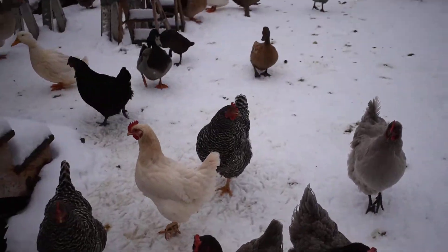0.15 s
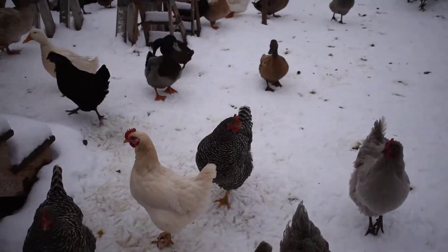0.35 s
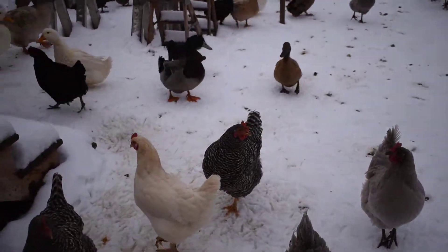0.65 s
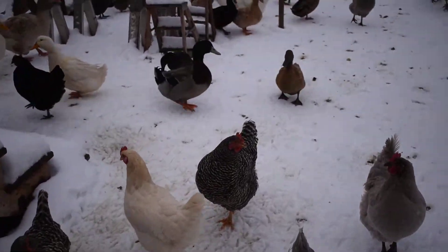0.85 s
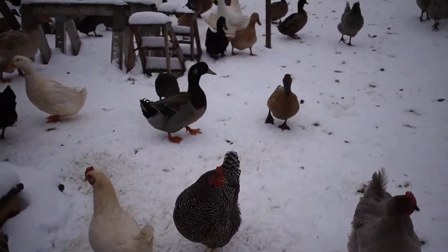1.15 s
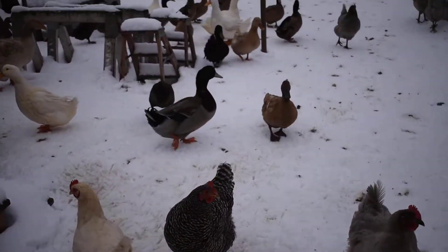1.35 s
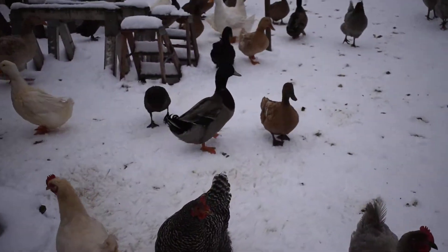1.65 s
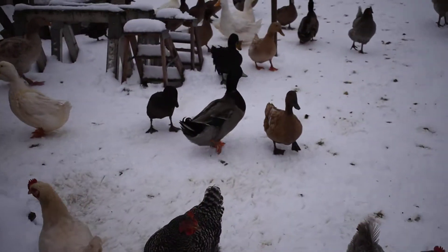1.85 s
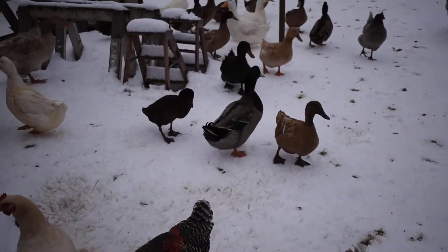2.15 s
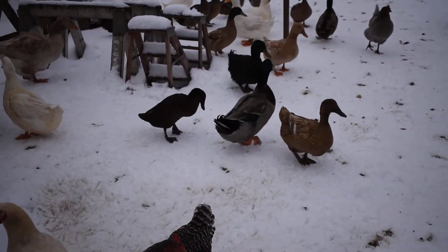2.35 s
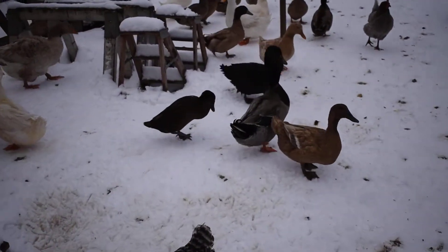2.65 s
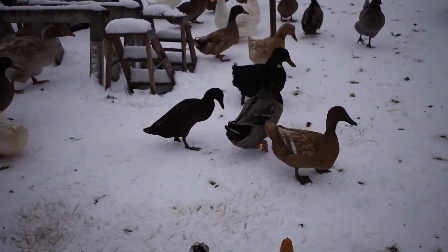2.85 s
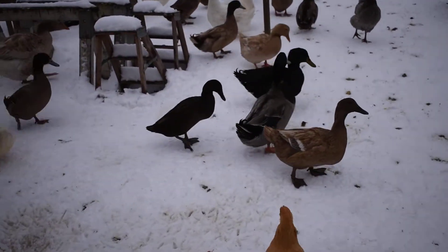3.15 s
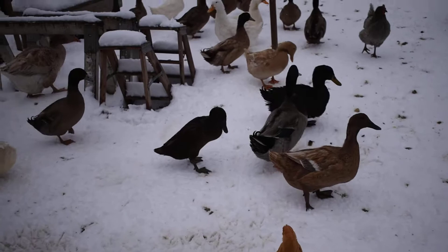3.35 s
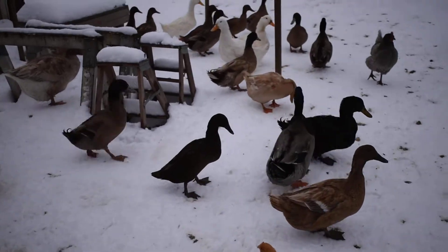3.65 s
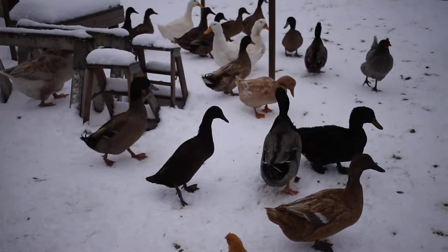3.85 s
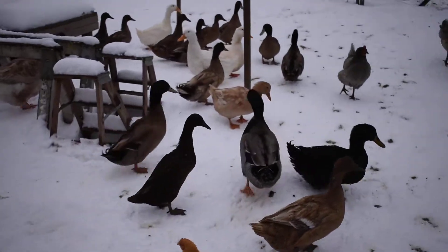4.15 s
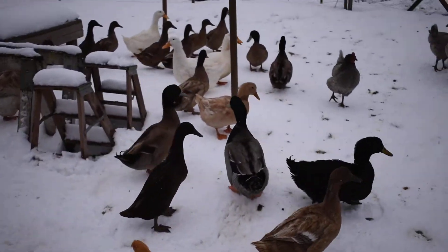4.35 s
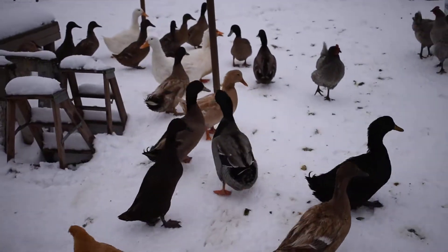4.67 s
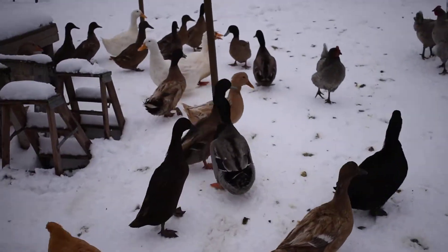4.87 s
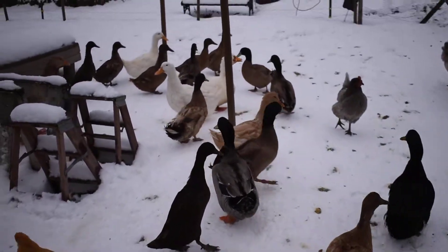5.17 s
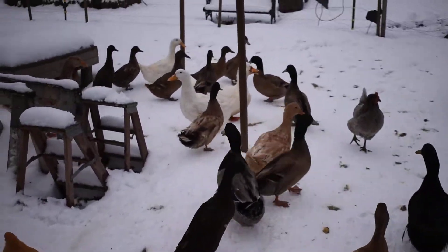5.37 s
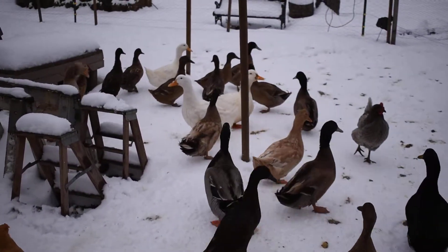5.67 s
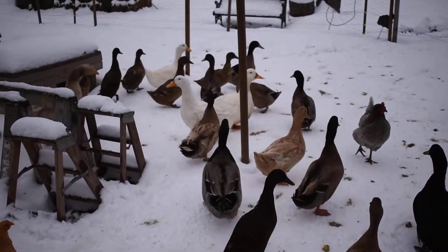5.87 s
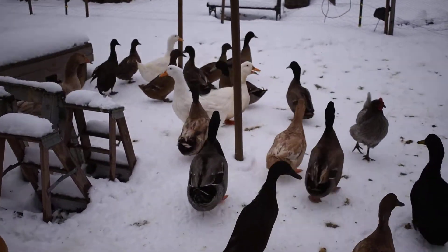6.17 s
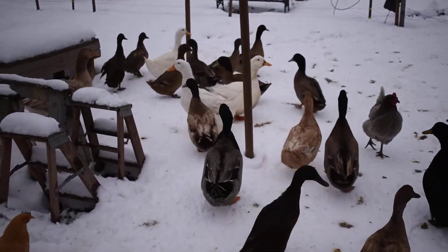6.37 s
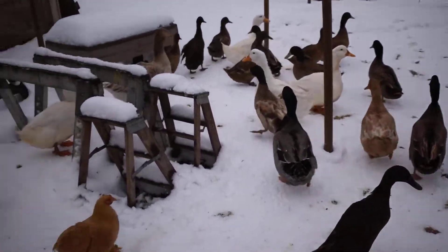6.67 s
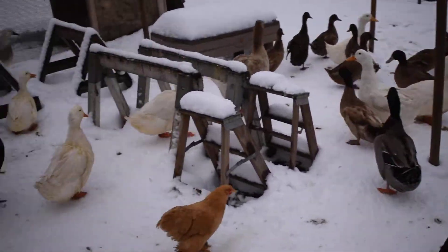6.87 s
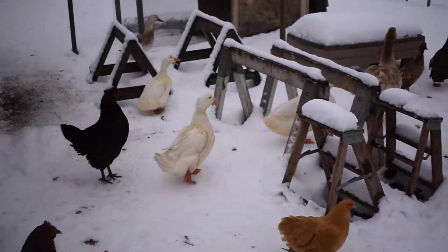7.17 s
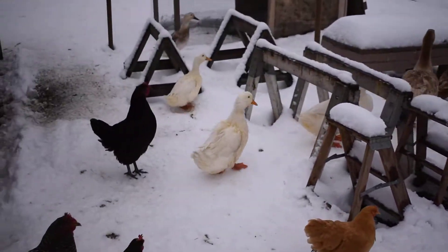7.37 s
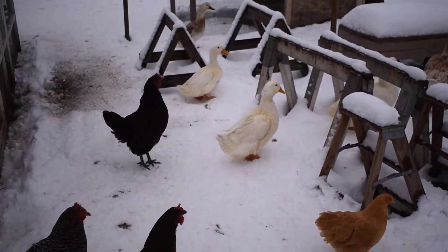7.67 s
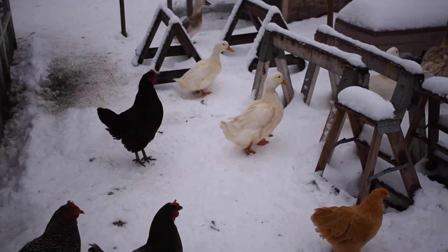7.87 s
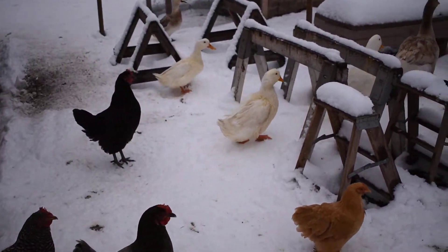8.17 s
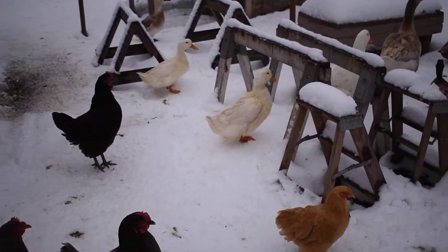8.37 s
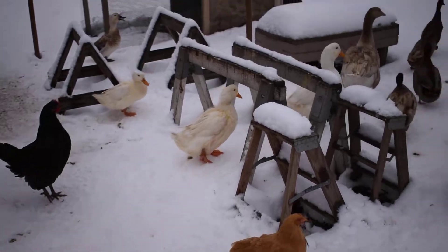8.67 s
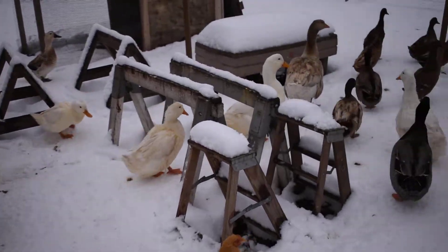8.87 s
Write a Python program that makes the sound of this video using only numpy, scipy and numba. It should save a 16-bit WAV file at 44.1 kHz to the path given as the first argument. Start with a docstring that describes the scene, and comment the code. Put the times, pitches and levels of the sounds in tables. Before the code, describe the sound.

Ducks chatter in rapid short quacks, then louder overlapping drawn-out quacks, over a muttering outdoor flock, with soft close knocks and late goose honks.

```python
"""A snowy yard in outdoor air: a far flock mutters throughout and a hen croons in the first second.
Near ducks chatter in short quacks, a drake mutters and dull knocks sound close to the microphone; a cluck
and a thin peep follow. From about four seconds long arched quacks take over, and late on a goose honks.
Pulses and breath ring the ducks' bills and throats; hen, goose, cluck and peep are sums of partials.
Knocks are damped swings with noise, the air is banded noise, and the snow leaves little echo."""
import sys
import numpy as np
from scipy import signal
from scipy.io import wavfile
from scipy.ndimage import uniform_filter1d
from numba import njit

SR = 44100
rng = np.random.default_rng(int(sys.argv[2]) if len(sys.argv) > 2 else 0)


def persist_wave(psi):
    """Save psi, clipped to +-1, as 16-bit WAV."""
    counts = np.round(np.clip(psi, -1, 1) * 32767).astype(np.int16)
    wavfile.write(sys.argv[1], SR, np.atleast_2d(counts).T)


N = 397782  # length in samples


def undb(db):
    """Turns dB into an amplitude factor."""
    return 10 ** (np.asarray(db) / 20)


def unit(x):
    """Scales a signal to an rms of 1."""
    return x / np.sqrt(np.mean(x ** 2) + 1e-18)


@njit
def svf(x, hz, width):
    """State-variable band-pass with a moving centre, gain 1 at the centre."""
    y, band, low, g, k, last_hz = np.empty(len(x)), 0., 0., 0., 0., 0.
    for i in range(len(x)):
        if hz[i] != last_hz:
            g, k, last_hz = np.tan(np.pi * hz[i] / SR), width / hz[i], hz[i]
        v = (band + g * (x[i] - low)) / (1 + g * (g + k))
        band = 2 * v - band
        low += 2 * g * v
        y[i] = k * v
    return y


def ring(x, hz, *widths_hz):
    """Rings a resonance: one band-pass at the same centre for each width."""
    for width in widths_hz:
        x = svf(x, hz + np.zeros(len(x)), 1. * width)
    return x


def walk(count, rate):
    """Random levels held 1 / rate s and slewed; spread near 1."""
    hold = int(SR / rate)
    steps = np.repeat(rng.standard_normal(count // hold + 1), hold)
    return 1.2 * uniform_filter1d(steps, hold)[:count]


def arch(start, length, turn, start_hz, turn_hz, end_hz, flat=2):
    """Times, progress 0-1 and a pitch that bends along two curves meeting flat at the turn."""
    u, turn = np.linspace(0, 1, num=41), np.clip(turn, .02, .98)
    away = np.where(u < turn, 1 - u / turn, (u - turn) / (1 - turn)) ** flat
    hz = turn_hz + (np.where(u < turn, start_hz, end_hz) - turn_hz) * away
    return start + length * u, u, hz


def swell(s, attack_s, release_s, ends_db):
    """Attack, hold and release in dB."""
    edge = np.maximum(1 - (s - s[0]) / attack_s, 1 - (s[-1] - s) / release_s)
    return ends_db * np.clip(edge, 0, 1)


def add(out, rows, voice, onset=.005, **settings):
    """Plays one call from its control rows (time first), with soft ends; onset in s."""
    s, *columns = np.transpose(rows)
    i, j = max(int(s[0] * SR), 0), min(int(s[-1] * SR), N)
    t = np.arange(i, j) / SR
    ends = np.clip(np.minimum((t - s[0]) / onset, (s[-1] - t) / 0.0015), 0, 1)
    controls = [np.interp(t, s, column) for column in columns]
    out[i:j] += ends * voice(*controls, **settings)


# outdoor noise colour: freq_hz, level_db (per Hz, relative)
AIR_COLOUR = [(25, -27), (60, -18), (125, -11), (220, -3), (400, -8), (1000, -6), (1800, -8), (3000, -14),
              (6300, -15), (8500, -21), (12500, -25), (16000, -29)]
# lift of the air bands under 200 Hz, before the overall level is set: time_s, lift_db
BASS_LIFT = [(0, 12.5), (1.998, 7), (3.3, 6.5), (3.7, 11), (4.1, 14), (4.3, 9), (4.6, -4), (6, 0.5),
             (7.1, 11), (7.7, 2), (8.5, 4), (8.7, 15), (9.02, 2)]


def air():
    """Half-octave bands of outdoor noise that swell together and flicker alone; the bass comes and goes."""
    out, common, gust = 0, walk(N, 4.51), walk(N, 7)
    rumble_db = np.interp(np.arange(N) / SR, *np.transpose(BASS_LIFT))
    colour_hz, colour_db = np.transpose(AIR_COLOUR)
    for hz in 30 * 2 ** np.arange(0, 9.1, .5):
        db = np.interp(np.log(hz), np.log(colour_hz), colour_db)
        db = db + 2 * common + 3 * walk(N, 9) + (rumble_db + 3.5 * gust) * (hz < 200)
        out = out + undb(db) * ring(rng.standard_normal(N), hz, hz, hz)
    return unit(out) * undb(-44.5)


@njit
def fire(hz, stretch, size):
    """A pulse at each wrap of the phase, shared between two samples; every cycle has its own length."""
    pulses, phase, p, k = np.zeros(len(hz) + 1), np.empty(len(hz)), .9, 0
    for i in range(len(hz)):
        step = hz[i] * stretch[k] / SR
        p += step
        if p >= 1:
            p, k = p - 1, k + 1
            pulses[i] += size[k] * p / step
            pulses[i + 1] += size[k] * (1 - p / step)
        phase[i] = p
    return pulses[:-1], phase


# fixed lower duck resonances: freq_hz, width_hz (each of two passes), level_db (before each call's trim)
LOWER_THROAT = [(760, 300, -15), (1020, 300, -9)]
# upper duck resonances, before each call's scaling: freq_hz, width_hz (each of two passes), level_db
UPPER_THROAT = [(3210, 530, 2), (4090, 500, -2.5), (4976, 580, 0), (5937, 440, -2.5), (7020, 580, -2.5),
                (8080, 1900, -15.5), (10530, 1500, -25.5), (13300, 1600, -32)]
PATCHY_DB = 3.2  # each upper throat resonance swells and fades on its own


def quack(hz, db, bill_hz, chest_db, treble_db, scale, rough, half, second_db, second,
          lowest_db=0, blunt=1, puff=0, throat_db=0, breath_db=-9):
    """Syrinx pulses and pulse-gated breath ring the bill and throat; the chest adds a clean low tone."""
    turn = np.cumsum(hz) / SR
    # the membranes are slack, so rougher, while the pitch is still below its top
    rough = np.clip(rough + 1.1 * (1 - hz / hz.max()) ** 1.5, 0, .6)
    cycle = np.arange(len(hz) // 40 + 4)
    chance = np.clip(rng.standard_normal((2, len(cycle))), -2, 2) * np.interp(cycle, turn, rough)
    size = undb(9 * chance[1]) * (1 - half * (cycle % 2))  # every second pulse is weaker by half
    pulses, phase = fire(hz, 1 + .11 * chance[0], size)
    breath = unit(np.exp(-phase / .3) * rng.standard_normal(len(hz)))
    drive = unit(pulses) + (1.3 * rough + puff) * breath
    low = ring(drive, bill_hz, 460, 536)
    # a second resonance moves with the bill
    low = low + undb(second_db) * ring(drive, second * bill_hz, 160, 630)
    for f, width, level_db in LOWER_THROAT:
        low = low + undb(level_db + throat_db) * ring(drive, f, width, width)
    airy = drive + (undb(breath_db) + 1.5 * rough) * breath
    high = 0
    for k, (f, width, level_db) in enumerate(UPPER_THROAT):
        gain = undb(level_db + lowest_db * (k == 0) + PATCHY_DB * walk(len(hz), 9))
        # neighbouring resonances have opposite signs
        high = high + (-1) ** k * gain * ring(airy, f * scale, width * blunt, width * blunt)
    chest = np.sqrt(2) * (np.sin(2 * np.pi * turn) + 0.14 * np.sin(4 * np.pi * turn))
    return -undb(db) * (unit(low) + undb(treble_db) * unit(high)) + undb(chest_db) * chest


# level of the whole far flock: time_s, level_db
FLOCK_LEVEL = [(0, -38), (.2, -47), (.35, -36), (.46, -46), (.95, -41.5), (1.28, -37.5), (1.4, -41),
               (1.5, -38.5), (1.65, -39.5), (2.1, -41), (2.25, -42), (2.6, -36), (2.76, -49), (2.95, -33.5),
               (3.15, -32), (3.4, -40), (3.52, -35), (3.64, -46), (3.9, -25), (4.17, -48.5), (4.3, -27.5),
               (4.721, -38), (6.05, -30.5), (6.449, -36), (6.92, -38), (7.3, -36), (7.38, -29.5),
               (7.47, -34.5), (7.8, -31.5), (8.36, -30), (8.52, -31), (9.02, -33)]


def far_flock():
    """Three far birds mutter hoarsely, each swelling and fading on its own, under one shared level."""
    birds, one = 0, np.ones(N)
    # mean pulse rate Hz, bill resonance Hz, chest tone dB
    for hz, bill_hz, chest_db in ((134.8, 1796, -44.0), (200, 920, -19), (250, 1295, -18.0)):
        wandering_hz, level_db = hz * undb(walk(N, 5)), 3.5 * walk(N, 11)
        moving_bill_hz = bill_hz * undb(1.23 * walk(N, 5.4))
        birds = birds + quack(wandering_hz, level_db, moving_bill_hz, chest_db * one, -19 * one, one,
                              rough=.35, half=0, second_db=-14, second=1.396,
                              lowest_db=-13, blunt=0.72, puff=1.0)
    return unit(birds) * undb(np.interp(np.arange(N) / SR, *np.transpose(FLOCK_LEVEL)))


def tone(hz, first_db, second_db, rasp_db, partials, throat):
    """A reedy voice roughened by noise; with a throat, rasp turns high partials into windpipe hiss."""
    turn = 2 * np.pi * np.cumsum(hz * (1 + .004 * walk(len(hz), 60))) / SR
    depth = np.clip(undb(rasp_db), 0, .4)
    rasp, mean_db = depth * walk(len(hz), 450), (first_db + second_db) / 2
    out = (1 + rasp) * (undb(first_db) * np.sin(turn) + undb(second_db) * np.sin(2 * turn))
    for multiple, db in partials:
        whole = np.clip(1 - depth * multiple * .18, 0, 1) if len(throat) else 1
        out = out + whole * (1 + 2 * rasp) * undb(mean_db + db) * np.sin(multiple * turn)
    puffs = (1 + np.sin(turn)) * rng.standard_normal(len(hz))
    for f, width, db in throat:
        out = out + depth * undb(mean_db + db) * unit(ring(puffs, f, width, width))
    return np.sqrt(2) * out


def sing(notes, partials=(), throat=()):
    """Plays tonal notes: the pitch bends through a turn while level and second partial glide."""
    out = np.zeros(N)
    for row in notes:
        s, u, hz = arch(*row[:6])
        db, change_db, second_db, end_second_db, rasp_db = row[6:]
        first_db = db + change_db * u + swell(s, attack_s=0.0023, release_s=0.0025, ends_db=-5)
        second = first_db + second_db + (end_second_db - second_db) * u
        rows = np.transpose([s, hz, first_db, second, rasp_db + 0 * u])
        add(out, rows, tone, partials=partials, throat=throat)
    return out


# hen notes: start_s, length_s, turn_share (of the length), start_pitch_hz, turn_pitch_hz, end_pitch_hz,
# level_db (first partial), end_change_db, second_start_db, second_end_db (both over the first), rasp_db
HEN_NOTES = [(-.01, 0.12, 0.49, 874, 939, 816, -30.5, -3, -16, -11, -7),
             (.135, 0.3, 0.4, 828, 781, 817, -34, -12, -26, -9, -5),
             (.455, 0.098, .45, 773, 827, 800, -35.5, 1.5, -38, -45, -22),
             (.546, 0.12, .4, 810, 825, 755, -32, -2.5, -41, -35, -27),
             (.675, 0.082, .1, 760, 748, 814, -39, 8.5, -27, -18, -13),
             (.762, 0.026, .5, 800, 807, 800, -29.5, -4, -30, -27, -5),
             (.786, 0.073, .6, 840, 872, 890, -25.5, -4, -42, -24, -14),
             (1.002, .046, .5, 824, 860, 845, -31.5, 2, -17, -7, -13)]
# multiple (of the pitch), level_db (over the mean dB of the first two partials)
HEN_OVERTONES = [(.5, -5), (3, -28)]


def hen():
    """An early croon: soft bending tones with a partial an octave below."""
    return sing(HEN_NOTES, HEN_OVERTONES)


# short quacks: start_s, level_db (before the shape), pulse_rate_hz and bill_hz (before the sag),
# chest_db (over level, before an 8.5 dB lift), treble_db (over the bill and lower throat), length_s (of the hold)
SHORT_QUACKS = [(0.102, -12.5, 223.6, 1300, -22.5, -12.5, 0.018), (0.228, -15, 216, 1700, -15, -7, 0.012),
                (0.362, -34, 210, 1600, -6, -26, 0.041), (0.594, -18, 263, 1650, -18, -12, 0.0066),
                (0.732, -8, 260.6, 1650, -21, -6.5, 0.011), (1.047, -11.5, 263.3, 1730, -20, -11, 0.0056),
                (1.114, -19.5, 235.5, 1040, -15, -30, 0.017), (1.19, -9, 250, 1790, -18.5, -5, 0.023),
                (1.315, -9.5, 236, 1700, -16.5, -4, 0.019), (1.597, -8.5, 218, 1700, -19.5, -9, 0.0083),
                (1.749, -8, 243.4, 1770, -23, -12, 0.03), (1.877, -8, 255.5, 1700, -22.5, -12.5, 0.026),
                (1.99, -9, 232.8, 1640, -20.5, -14, 0.021), (2.297, -26, 222.5, 1090, -7.5, -6, 0.012),
                (2.398, -13.5, 194.7, 1650, -21, -13.5, 0.01), (2.509, -11, 238, 1600, -19.5, -5.5, 0.019),
                (2.689, -9, 219, 1090, -26.5, -15.5, 0.018), (2.789, -16.5, 266.6, 1610, -12, -9.5, 0.0075),
                (2.832, -33, 217, 930, -21, -3, 0.068), (2.898, -8, 232.5, 1650, -21, -6.5, 0.025),
                (3.033, -11.5, 216, 1590, -18, -8.5, 0.0097), (3.112, -16, 215.7, 1600, -20, -9.5, 0.01),
                (3.236, -9.5, 216.6, 1810, -20.5, -13, 0.01), (3.264, -11.5, 248.4, 1270, -20, -14, 0.013),
                (3.456, -11.5, 202.2, 1830, -20, -15, 0.012), (3.496, -25.5, 191.5, 1350, -25, -21, 0.033),
                (3.57, -4, 238, 1780, -29.5, -19, 0.009), (3.699, -8.5, 197, 1700, -27, -18, 0.02),
                (4.198, -27, 220.6, 1010, -32, -17, 0.019), (6.492, -23, 209, 860, -14, -19, 0.034),
                (6.978, -24, 210, 875, -20, -30, 0.032)]


def chatter():
    """Short duck quacks that start hard and sag in pitch and bill resonance."""
    out = np.zeros(N)
    for start, db, hz, bill_hz, chest_db, treble_db, length in SHORT_QUACKS:
        # time s, level change dB, pitch factor
        shape = [(-.009, -24, 1), (.004, -10, 1), (length * 0.93, -9, .97),
                 (length + 0.0048, -18, .92), (length + 0.023, -36, .9)]
        rows = [(start + t, hz * sag, db + g, bill_hz * sag, db + chest_db + g + 8.5, treble_db, 1.08)
                for t, g, sag in shape]
        add(out, rows, quack, onset=0.0052, rough=.17, half=0, second_db=-12, second=1.39,
            lowest_db=3, blunt=1.54, puff=.25, breath_db=-3)
    return out


# knocks near the microphone: start_s, level_db (before an 11.5 dB lift and the damping),
# pitch_hz, crack_db (gain of the crack noise over the swing)
CLOSE_KNOCKS = [(0.187, -22.5, 324, -21), (0.699, -32.5, 199, -36), (0.954, -30, 385, -34),
                (1.05, -21, 443, -38), (1.097, -23.5, 480, -40), (1.115, -26, 363, -40),
                (1.149, -26, 286, -40), (1.683, -24.5, 285, -37), (1.817, -33.5, 338, -34),
                (1.843, -36, 240, -32), (1.957, -32, 190, -29), (2.583, -23, 355, -40),
                (2.595, -31, 250, -35), (2.636, -24.5, 404, -13), (2.648, -31.5, 298, -30),
                (2.73, -32.5, 284, -39), (2.746, -32, 270, -39), (2.779, -32, 250, -39),
                (3.402, -38, 119, -14), (3.417, -35, 150, -18), (3.495, -22, 352, -40),
                (3.974, -23, 480, -35), (3.99, -33, 131, -35), (4.208, -35.5, 217, -9),
                (4.287, -25, 410, -31), (4.369, -24.5, 272, -29), (5.349, -26, 343, -20),
                (5.377, -30.5, 242, -12), (6.908, -41, 288, -8), (7.037, -25, 397, -28),
                (7.15, -36, 288, -21), (8.682, -31, 450, -18), (8.73, -28, 400, -23)]


def knocks():
    """Each knock is a heavily damped low swing, a short dull crack and a crunchy low tail."""
    out, t = np.zeros(N + SR), np.arange(SR // 10) / SR
    for start, db, hz, crack_db in CLOSE_KNOCKS:
        noise = rng.standard_normal(len(t))
        swing = np.sin(2 * np.pi * hz * t) * np.exp(-t * hz / 1.2) * np.clip(t / 0.0012, 0, 1) ** 2
        crack = undb(crack_db) * ring(noise, 3000, 8100) * np.exp(-t / 0.0043)
        crunch = undb(-16.0) * unit(ring(noise, 0.63 * hz, hz))
        crunch = crunch * np.exp(-t / 0.022) * np.clip(t / 0.0015, 0, 1)
        i = int(start * SR)
        out[i:i + len(t)] += undb(db + 11.5) * (swing + crack + crunch)
    return signal.sosfilt(signal.butter(2, 60, "high", fs=SR, output="sos"), out[:N])


RISING_DB_PER_OCTAVE, FALLING_DB_PER_OCTAVE = 22.5, 10  # treble lost per octave of pitch under the top
THROAT_PER_OCTAVE = 0.27  # the upper throat resonances sink with the pitch
WAVER, WAVER_DB = .03, 1.8  # unsteady pitch share per unit of roughness, and unsteady level
# long quacks: start_s, length_s, top_share (of the length), start_rate_hz, top_rate_hz, end_rate_hz (pulses),
# level_db, end_change_db, start_bill_hz, top_bill_hz, end_bill_hz, second_bill_db, chest_db,
# treble_db (over the bill and lower throat, at the top pitch), throat_scale (at the top pitch)
LONG_QUACKS = [(0.249, 0.178, 0.45, 240.9, 311.3, 224, -23.5, -2, 940, 1140, 1050, -32, -44, -18, 0.94),
               (.855, 0.065, 0.75, 212, 211.5, 200, -18.5, -5, 1100, 1080, 1050, -1, -38, -12.5, 0.91),
               (3.129, 0.066, 0.29, 250, 265, 240, -26, -1, 1400, 1400, 1500, -13, -34.5, -5.5, 0.77),
               (3.787, 0.082, 0.74, 196.8, 265.4, 270, -18.5, -7.5, 950, 1080, 1080, -24, -34, -13, 0.81),
               (3.895, 0.072, 0.106, 256, 269.2, 197, -23, 5.5, 1080, 1050, 1190, -27, -41, -17.5, 1),
               (4.245, 0.059, 1, 210, 228.7, 224, -28.5, 2.5, 1850, 1500, 1200, 1, -51, -12, 0.99),
               (4.335, 0.32, 0.71, 200, 348, 241.7, -14.5, -3, 1040, 1500, 1450, -7.5, -48.5, -1.5, 0.9),
               (4.8, 0.08, 1, 237, 240, 247, -22.5, -4, 1170, 1240, 1260, -8, -32.5, -12.5, 1),
               (4.862, 0.24, 0.59, 224.3, 329.5, 278.5, -13, -4, 1130, 1430, 1310, -8.5, -44, -4.5, 0.9),
               (5.09, .31, 0.5, 308, 287.5, 266, -27, 9, 1450, 1360, 1300, -3.5, -45.5, -4.5, 0.95),
               (5.371, 0.065, 0.62, 238.2, 243.5, 260, -17.5, -1.5, 1220, 1170, 1200, -4, -37, -5, 1),
               (5.415, 0.2, 0.75, 250, 301.7, 272, -17.5, -1, 1500, 1630, 1700, -7, -40.5, -3.5, 0.93),
               (5.61, 0.37, 0.43, 259.1, 337, 252.7, -18.5, -9.5, 1320, 1830, 1500, -18, -39, -1, 0.97),
               (5.635, 0.26, 0.52, 222.8, 284, 268, -23, 6, 1640, 1730, 1860, -15, -48, -8, 0.74),
               (5.846, 0.19, 0.51, 230.5, 238.7, 189, -24.5, 0, 1770, 1260, 1190, -19, -45, -15, 0.94),
               (6.085, 0.28, 0.74, 178.8, 254.4, 227.6, -17.5, -5.5, 1120, 1264, 1470, -8, -37.5, -9, 1),
               (6.111, 0.29, 0.61, 245, 309.6, 248.7, -15.5, -8, 1430, 1700, 1700, 0.5, -43.5, -8, 0.97),
               (6.495, 0.26, 0.98, 206.8, 242, 230, -26, 8, 840, 1380, 1720, -6, -41, -11, 0.98),
               (6.565, 0.28, 0.46, 225.3, 308.6, 254.7, -17.5, 0, 1450, 1830, 1710, -11, -38.5, -9, 0.98),
               (6.986, 0.29, 0.6, 229, 247.3, 226, -18, -5, 1200, 1600, 1650, -33, -41, -13.5, 0.935),
               (7.07, 0.21, 0.63, 241.1, 273.4, 237.8, -20, -1, 1600, 1910, 1650, -6, -37, -6, 1),
               (7.336, 0.11, 0.89, 193.3, 258, 250, -31, -4, 1600, 1760, 1800, -23, -51.5, -13.5, 1),
               (7.505, 0.25, 0.054, 270, 275.3, 167.6, -29, 12.5, 1150, 1160, 1470, -11, -45, -10, 1),
               (7.555, 0.2, 0.59, 203.3, 274.2, 242.7, -18.5, -0.5, 1500, 1700, 1650, -19, -37.5, -10, 1),
               (7.9, 0.45, 0.55, 205, 268.3, 204, -22, 0.5, 1360, 1450, 1360, -9, -43.5, -7.5, 0.92),
               (8.535, 0.26, 0.43, 206.4, 259.9, 222.6, -20, -2, 1330, 1470, 1340, -16, -43.5, -8.5, 0.94),
               (5.1, 0.17, 0.5, 228.4, 247.2, 228, -21.5, -2.5, 1540, 1670, 1650, -5, -44.5, -24, 0.92),
               (5.555, 0.13, 0.47, 215.2, 234, 223, -21, -1.5, 1220, 1290, 1240, 2.5, -46.5, -15, 1),
               (6.49, 0.086, 0.49, 190, 214.3, 208, -23.5, 2, 930, 1000, 1030, -6.5, -43, -16, 1)]
# voice of each, same order: roughness (0-1, at the top pitch), half (weakening of every second pulse, 0-1)
LONG_VOICE = [(.28, .2), (.35, 0), (.18, 0), (.2, .15), (.2, .1), (.45, 0), (.04, .05), (.2, .4), (.08, .2),
              (.04, .7), (.5, .3), (.05, 0), (.15, 0), (.2, 0), (.1, 0), (.05, 0), (.28, 0), (.15, 0),
              (.1, .2), (.15, 0), (.1, .2), (.5, 0), (.2, 0), (.08, 0), (.18, .45), (.06, .65), (.2, 0),
              (.3, 0), (.3, 0)]
# colour of each, same order: second_bill_hz (at the top pitch), lowest_upper_db (trim), lower_throat_db (trim),
# breath_db (in the treble, before the part from roughness), flatness (of the pitch arch, 2 is a parabola)
LONG_COLOUR = [(1500, 2, 0, -10, 3.1), (1450, 2, 6, -1, 1.6), (1700, 5, 1, 4, 2.15), (1450, -4, 6, -6, 1.3),
               (1500, 1, -4, -6, 2.2), (1920, 7, 0, -6, 3.2), (1970, 4, 0, -6, 2.5), (1650, -7, 0, -1, 3.2),
               (1950, 2.5, -2, -6, 2.6), (2460, -5, 3, -8, 1.6), (1650, 9, -13, -2, 1.6),
               (1980, 0, 6, 3, 2.2), (2260, 3, -3.5, -5, 2.2), (2494, 5, 1, 5, 2.4),
               (1650, -7, -18, 9, 2.2), (1700, 2, -6.5, -4, 2.1), (2210, 0.5, -1, 8, 2.2),
               (2100, -18, 4.5, 0, 1.7), (2290, -23, -1, 9, 2.4), (2140, -16, -2.5, -1, 2.4),
               (2460, -11, 0.5, 0, 2.6), (2600, -10, 3, -2, 1.5), (1600, -13, 8, 1, 2.2),
               (2210, -4, 2.5, 10, 1.6), (1750, 0.5, 1, 14, 4), (1950, 2, 1.5, -5, 2.6),
               (2080, -10, -3, -6, 2.2), (1700, 0, -4, -6, 2.06), (2470, 0, -4, -3, 2.16)]


def long_quacks():
    """Long arched duck quacks: the bill opens as the pitch rises, and treble comes late and leaves early."""
    out = np.zeros(N)
    for row, (rough, half), colour in zip(LONG_QUACKS, LONG_VOICE, LONG_COLOUR):
        second_hz, lowest_db, throat_db, breath_db, flat = colour
        s, u, hz = arch(*row[:6], flat)
        (db, change_db, start_bill_hz, top_bill_hz, end_bill_hz,
         second_db, chest_db, treble_db, scale) = row[6:]
        ends_db = swell(s, attack_s=0.03, release_s=0.023, ends_db=-4)
        octaves_under, top = np.log2(hz.max() / hz), np.argmax(hz)
        rising = u <= u[top]
        # the bill opens with the rising pitch, then drifts to its closing shape
        opening_hz = top_bill_hz + (start_bill_hz - top_bill_hz) * octaves_under / (octaves_under[0] + 1e-9)
        closing_hz = np.interp(u, [u[top], 1], [top_bill_hz, end_bill_hz])
        bill_hz = np.where(rising, opening_hz, closing_hz)
        waver = uniform_filter1d(rng.standard_normal((2, len(u))), size=5) * np.sqrt(5)
        pulse_hz = hz * (1 + WAVER * rough * waver[0])
        level_db = db + change_db * u + ends_db + WAVER_DB * waver[1]
        lost_db = np.where(rising, RISING_DB_PER_OCTAVE, FALLING_DB_PER_OCTAVE) * octaves_under
        bright_db = treble_db - lost_db + swell(s, attack_s=0.058, release_s=0.065, ends_db=-3.5)
        throat_scale = scale - THROAT_PER_OCTAVE * octaves_under
        rows = np.transpose([s, pulse_hz, level_db, bill_hz, chest_db + ends_db, bright_db, throat_scale])
        add(out, rows, quack, onset=0.0056, rough=rough, half=half, second_db=second_db,
            second=second_hz / top_bill_hz, lowest_db=lowest_db, throat_db=throat_db, breath_db=breath_db)
    return out


# drake mutters: start_s, length_s, level_db (before the shape), bill_hz
DRAKE_MUTTERS = [(0.486, 0.067, -36.5, 1700), (1.448, 0.13, -44.5, 1700), (2.045, 0.093, -36.5, 1650),
                 (2.188, 0.038, -42, 1670), (2.578, 0.093, -35, 1740), (4.02, 0.075, -37.5, 1560),
                 (1.347, 0.049, -48, 1600), (6.863, 0.36, -38.5, 1950), (7.4, 0.034, -44, 1950),
                 (2.285, 0.059, -41.5, 1750), (2.833, 0.09, -42.5, 1500), (2.929, 0.048, -40.5, 1410)]


def drake():
    """Slow raspy mutters: a low pulse rate with much breath and a fixed second resonance."""
    out = np.zeros(N)
    for start, length, db, bill_hz in DRAKE_MUTTERS:
        shape = [(0, -8), (.25, 6), (.75, 6.5), (1, -11)]  # share of the length, level change dB
        # pulse rate 101.9 Hz, chest -65 dB, treble -22 dB, throat scale .96
        rows = [(start + u * length, 101.9, db + g, bill_hz, -65, -22, .96) for u, g in shape]
        add(out, rows, quack, rough=.28, half=0, second_db=-5, second=2650 / bill_hz,
            lowest_db=-8, puff=2.2)
    return out


# one cluck, columns as the hen's: start_s, length_s, turn_share, start_pitch_hz, turn_pitch_hz, end_pitch_hz,
# level_db, end_change_db, second_start_db, second_end_db, rasp_db
CLUCK_NOTE = [(2.441, 0.021, 0.28, 680, 739, 625, -17, -9.5, 3.5, 6, -9)]
# multiple (of the pitch), level_db (over the mean dB of the first two partials)
CLUCK_OVERTONES = [(3, -13), (4, -11), (5, -22), (6, -15), (7, -30)]


def cluck():
    """One sharp cluck: a very short note with a strong second partial and overtones."""
    return sing(CLUCK_NOTE, CLUCK_OVERTONES)


# peeps, columns as the hen's: start_s, length_s, turn_share, start_pitch_hz, turn_pitch_hz, end_pitch_hz,
# level_db, end_change_db, second_start_db, second_end_db, rasp_db
PEEP_NOTES = [(2.98, 0.11, 0.23, 2080, 2100, 2020, -40, -8, -28, -25, -14),
              (3.325, 0.132, .1, 2240, 2165, 2120, -38.5, -6, -30, -28, -14)]


def peep():
    """A thin high peep: two partials, the second weak."""
    return sing(PEEP_NOTES)


# goose notes, columns as the hen's: start_s, length_s, turn_share, start_pitch_hz, turn_pitch_hz, end_pitch_hz,
# level_db, end_change_db, second_start_db, second_end_db, rasp_db
GOOSE_NOTES = [(7.803, 0.11, 0.51, 657, 731.5, 727, -23.5, 2.5, 2.9, -0.5, -14),
               (7.912, 0.074, 0.15, 700, 694, 695, -24.5, -4, 9, 7, -11.5),
               (8.085, 0.15, 0.18, 607, 757, 743, -22.5, 1.5, 2, -18, -7.5),
               (8.383, 0.09, 0.49, 667, 752, 702, -21.5, 3, 1, -2, -14),
               (8.47, 0.049, 0.24, 690, 674.6, 654, -28.5, -10.5, 11.3, 14, -14),
               (8.598, 0.04, 0.24, 605, 570, 673, -25, -2, 1, 4, -7),
               (8.632, 0.222, 0.47, 677.4, 677.6, 683, -26, -3, 5.3, 10.5, -28),
               (8.85, 0.088, 0.4, 687, 707, 678, -24.5, -2, 3.5, 4.5, -17.5),
               (8.94, 0.2, 0.3, 680, 681, 694, -28.5, 8.5, 12.8, -3, -35)]
# multiple (of the pitch), level_db (over the mean dB of the first two partials)
GOOSE_OVERTONES = [(1.5, -14.5), (2.5, -13), (3.5, -24.5), (4, -35), (6, -38), (6.5, -34), (7, -20.5),
                   (7.5, -16.5), (8, -29), (8.5, -17.5), (9, -26), (10, -30), (11, -37)]
# windpipe resonances that the rasp rings: freq_hz, width_hz (each of two passes), level_db (before rasp depth)
WINDPIPE = [(2730, 90, -8), (4820, 380, -4.5), (5730, 1200, -6), (6500, 1300, -9.5)]


def goose():
    """Honks rich in partials, some between the harmonics, with rasp hissing in the windpipe."""
    return sing(GOOSE_NOTES, GOOSE_OVERTONES, WINDPIPE)


YARD_T60_S, YARD_DB, YARD_TOP_HZ = 0.09, -17.5, 2520


def yard_echo(birds):
    """Sheds and fences scatter a short, dull noise tail that starts 8 ms late."""
    t = np.arange(SR // 2) / SR
    tail = rng.standard_normal(len(t)) * np.exp(-np.log(1000) * t / YARD_T60_S) * (t > .008)
    tail = signal.sosfilt(signal.butter(1, YARD_TOP_HZ, fs=SR, output="sos"), tail)
    return undb(YARD_DB) * signal.fftconvolve(birds, tail / np.sqrt(np.sum(tail ** 2)))[:N]


def scene():
    """All birds with their yard echo; the knocks and the air reach the microphone without it."""
    birds = far_flock() + hen() + chatter() + long_quacks() + drake() + cluck() + peep() + goose()
    return (air() + birds + yard_echo(birds) + knocks())[None]


def record(dry):
    """The microphone rounds the loudest peaks, dulls the top and hisses faintly; the recorder cuts the top."""
    rounded = .8 * np.tanh(dry / .8)
    dull = signal.sosfilt(signal.butter(2, 8500, fs=SR, output="sos"), rounded)
    hiss = undb(-82) * rng.standard_normal(dry.shape)
    return signal.sosfilt(signal.ellip(10, .2, 70, 15750, fs=SR, output="sos"), dull + hiss)


dry = scene()
out = record(dry)
persist_wave(out)
```